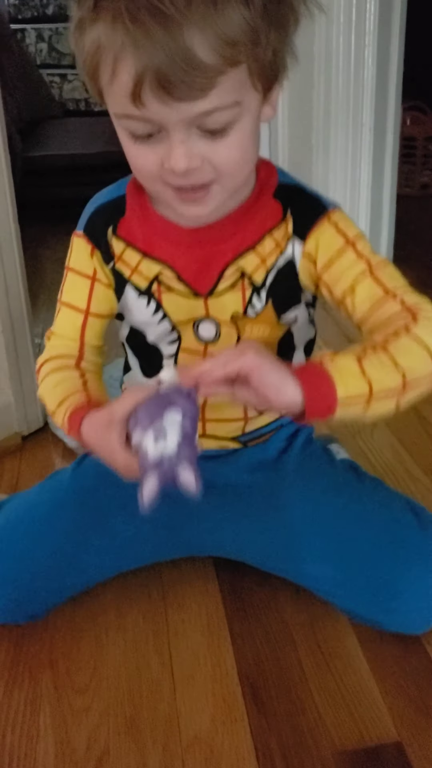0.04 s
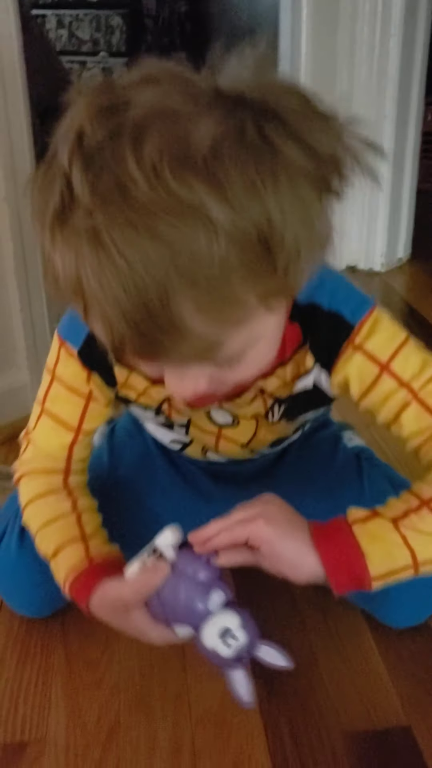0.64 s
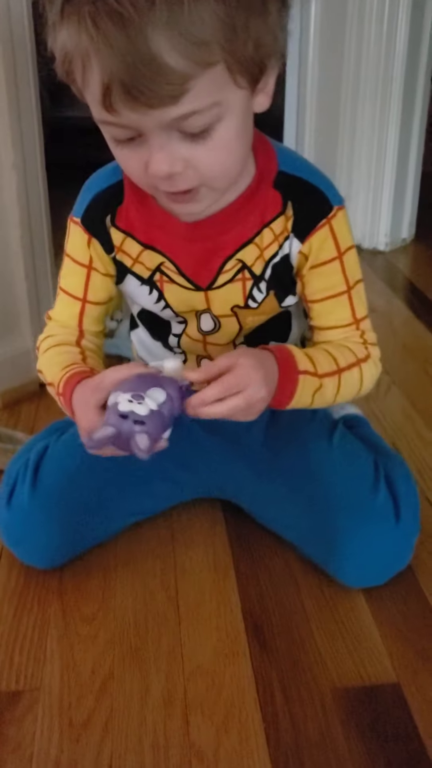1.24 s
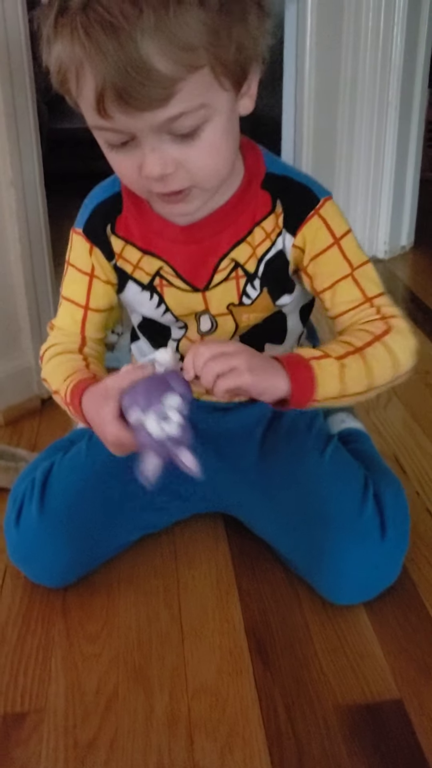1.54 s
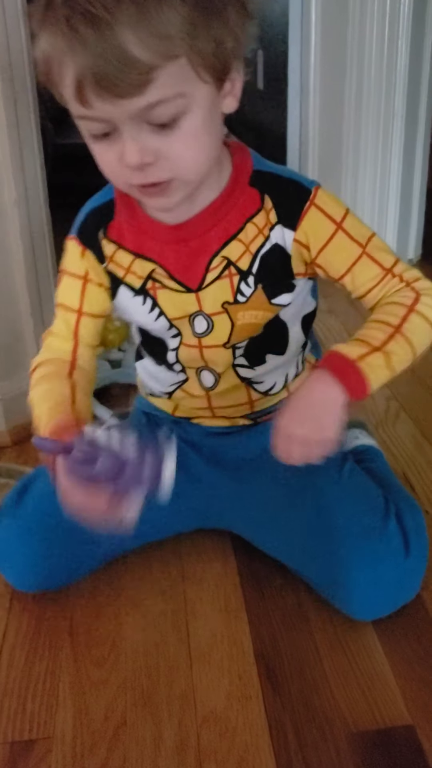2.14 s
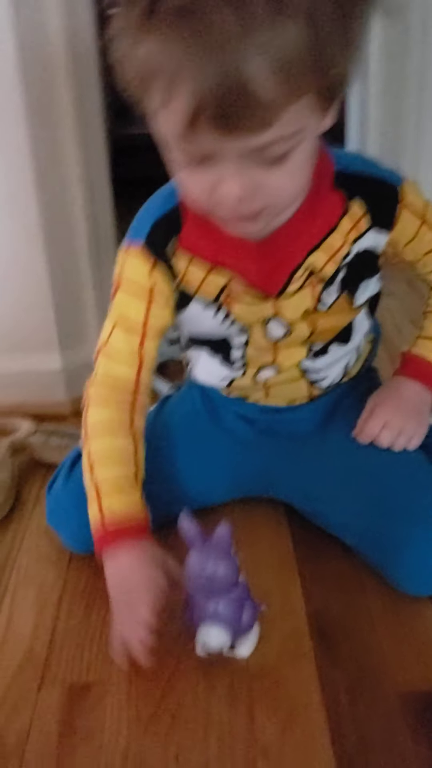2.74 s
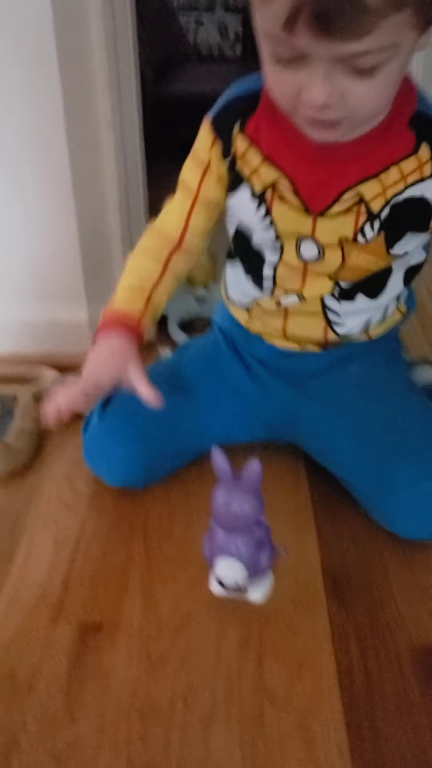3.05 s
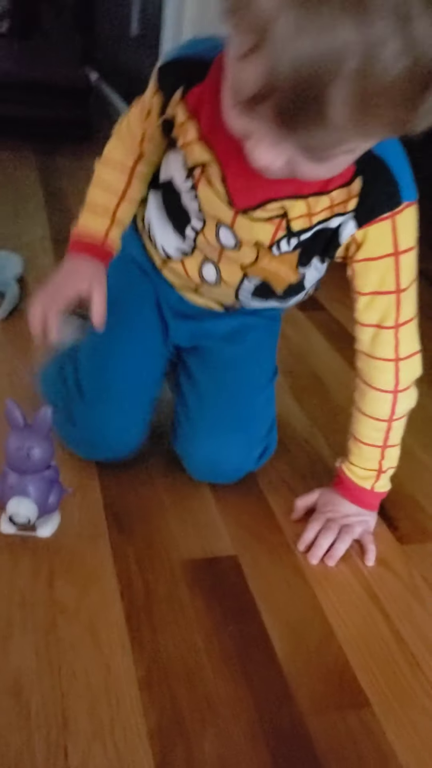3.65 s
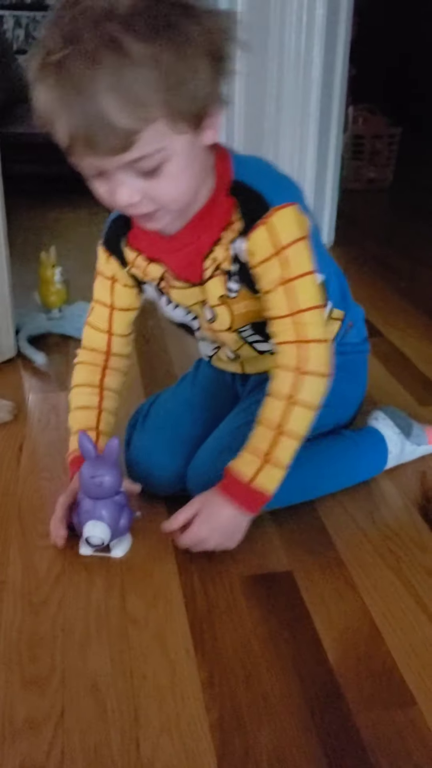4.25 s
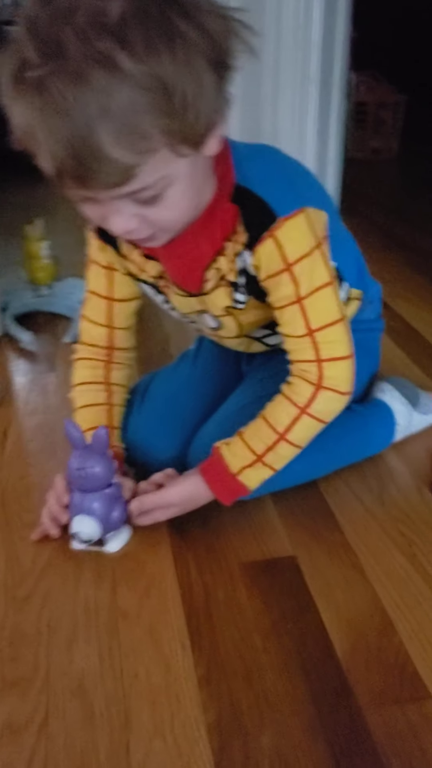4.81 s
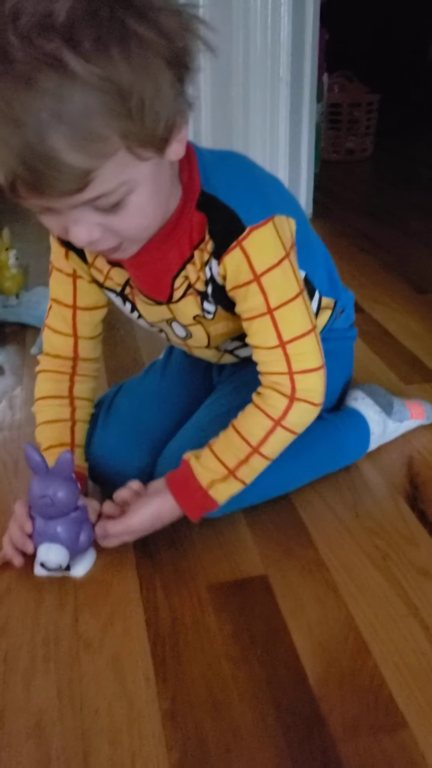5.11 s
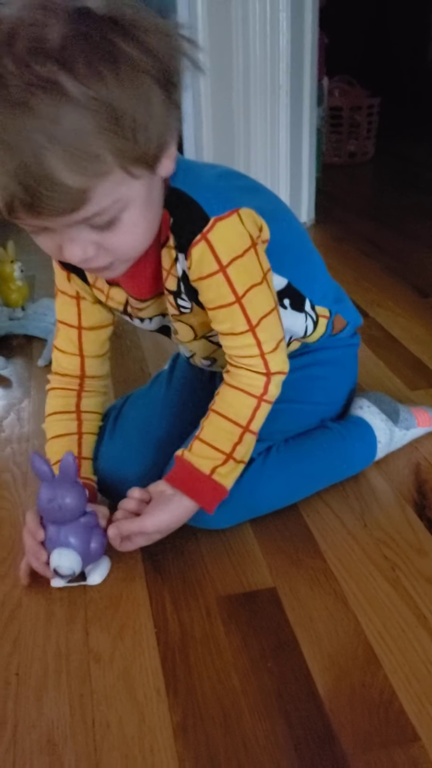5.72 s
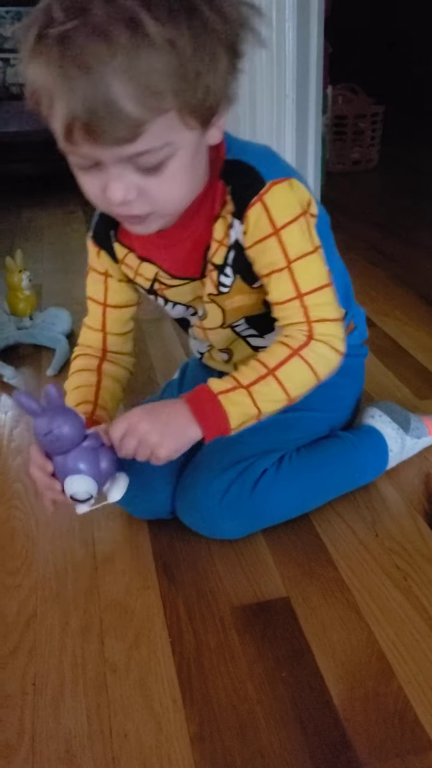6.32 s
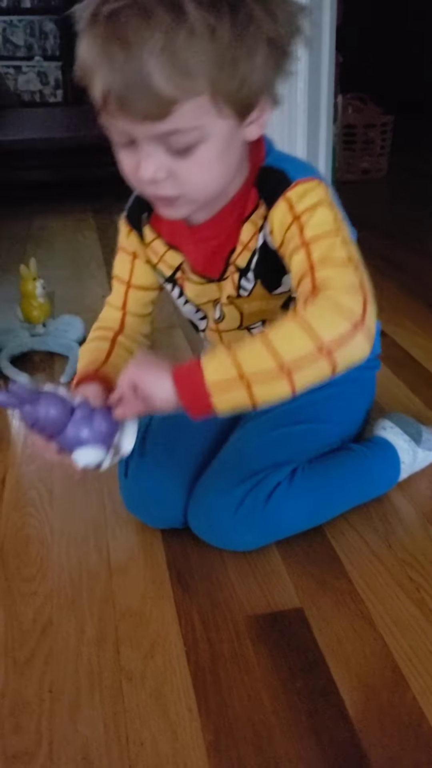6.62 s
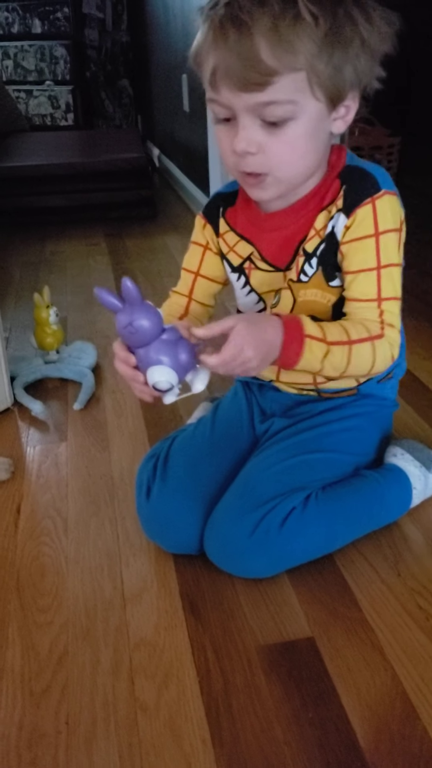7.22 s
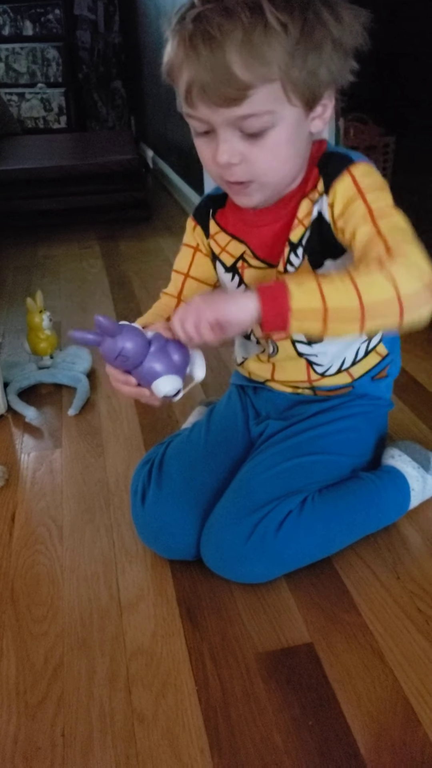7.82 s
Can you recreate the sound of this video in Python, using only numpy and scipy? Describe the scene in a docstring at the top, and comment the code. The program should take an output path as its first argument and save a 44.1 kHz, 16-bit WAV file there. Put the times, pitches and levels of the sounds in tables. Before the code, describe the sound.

A plastic wind-up toy is wound with crisp, uneven clicks and brief whirrs of its gears. It knocks sharply on a wooden floor and clatters, with a few soft bumps. After a lull and some lighter taps, the winding resumes in two faster runs of ratcheting clicks. The microphone is about a metre away in a small, bare room with faint hiss.

```python
"""A plastic clockwork toy is wound and handled on a wooden floor, about a metre from a hand-held phone.
Its pawl snaps over the ratchet teeth and rings the hollow shell; the gears whirr in short runs, and
the toy knocks and clatters. The floor and the hand on the phone add soft bumps and rustle, with one
creak and two faint low tones. A small bare room answers over a thin hiss."""
import sys
import numpy as np
from scipy import signal
from scipy.fft import rfft, irfft, next_fast_len
from scipy.io import wavfile
from scipy.ndimage import uniform_filter1d

SR = 44100
rng = np.random.default_rng(int(sys.argv[2]) if len(sys.argv) > 2 else 0)


def put_to_file(sound):
    """Save the sound as 16-bit audio at rate SR, in the file named by the first command-line argument."""
    columns = np.atleast_2d(sound).T  # one column per channel
    safe = np.clip(columns, -1, 1)
    whole_steps = np.round(safe * 32767)
    wavfile.write(sys.argv[1], SR, whole_steps.astype(np.int16))


N = 355690
TIME = np.arange(N) / SR
SIZE = next_fast_len(N + SR, True)
FREQ = np.maximum(np.arange(SIZE // 2 + 1) * SR / SIZE, 1)
# the phone's left port faces away from the toy: (frequency [Hz], left minus right [dB])
LEFT_PORT_EQ = [(200, -4), (700, 0.5), (1400, -5), (2400, -8), (3300, 5), (4300, -23.5), (5700, -22),
                (7000, -13), (9500, -18.5), (11800, -12), (13400, -13.5), (15500, -7.5)]


def undb(db):
    """Decibels to gain."""
    return 10 ** (np.asarray(db) / 20)


def unit(x):
    """Scale to rms 1."""
    return x / np.sqrt(np.mean(x ** 2))


def curve(points):
    """Automation line through (time [s], value) points."""
    return np.interp(TIME, *np.transpose(points))


def colour(points):
    """EQ curve through (frequency [Hz], level [dB]) points."""
    hz, db = np.transpose(points)
    return undb(np.interp(np.log(FREQ), np.log(hz), db))


def above(hz, order):
    """Gain of a high-pass."""
    return 1 / np.sqrt(1 + (hz / FREQ) ** (2 * order))


def resonance(hz, width_hz):
    """Bell curve of one mode, peaking at 1."""
    return 1 / (1 + ((FREQ / hz - hz / FREQ) * hz / width_hz) ** 2)


def shape(x, gain):
    """Minimum-phase EQ: nothing rings ahead of a transient."""
    cepstrum = irfft(np.log(np.maximum(gain, 1e-6)), SIZE)
    cepstrum[1:SIZE // 2] *= 2
    cepstrum[SIZE // 2 + 1:] = 0
    return irfft(rfft(x, SIZE) * np.exp(rfft(cepstrum)), SIZE)[..., :N]


def walk(rate_hz):
    """Random drift with a spread near 1."""
    knots = np.arange(0, N / SR + 1, 1 / rate_hz)
    return np.interp(TIME, knots, rng.standard_normal(len(knots)))


def gate(start, end, fade_samples):
    """On-off envelope with soft edges."""
    return uniform_filter1d(1. * ((TIME > start) & (TIME < end)), fade_samples)


def spell(start, length, attack_s, release_db_per_s, swell_db=0):
    """Envelope that rises, holds while it swells or sags, then dies away."""
    t = TIME - start
    db = swell_db * np.clip(t / length, 0, 1) - release_db_per_s * np.maximum(t - length, 0)
    return np.clip(t / attack_s, 0, 1) * undb(np.maximum(db, -200))


def add(track, start_s, sound):
    """Mix a sound into a track at its cue."""
    start = max(int(start_s * SR), 0)
    part = track[..., start:start + sound.shape[-1]]
    part += sound[..., :part.shape[-1]]


def room_tone(right_db=-69, left_db=-64):
    """Faint steady room noise, partly alike at the two ports."""
    eq = colour([(500, -15.5), (800, -12), (1100, -15), (2200, 1), (3100, -15.5), (10400, -34)])
    noise = rng.standard_normal(N) + rng.standard_normal((2, N))
    return unit(shape(noise, eq * above(430, order=2))) * undb([[left_db], [right_db]])


def hiss(hiss_trim_db=1, air_trim_db=2, air_left_db=-9, flicker_db=0.2):
    """Wide, slightly wavering hiss with a thin airy top."""
    # fader rides of the two bands: (time [s], level [dB])
    hiss_ride = [(0, -54), (1.4, -54), (2.3, -57), (3.2, -54.5), (3.38, -66), (3.9, -58.5), (4.54, -64.5),
                 (4.62, -71.5), (5.4, -72)]
    air_ride = [(0, -110), (2.1, -48.5), (2.35, -63.5), (4.55, -59.5), (5.1, -61), (8.06, -93)]
    # their spectra: (frequency [Hz], level [dB])
    hiss_eq = [(100, -29), (500, -18), (800, -6), (1100, -11), (1850, -6.5), (2200, 4.5), (3100, -13.5),
               (4400, -9), (5850, -2), (6600, -13.5), (10300, -23.5), (12500, -13), (15500, -24.5)]
    air_eq = [(2000, -36.5), (4500, -0.5), (10300, -9), (12000, 0.5)]
    wide = shape(rng.standard_normal((2, N)), colour(hiss_eq))
    wide[0] = shape(wide[0], colour(LEFT_PORT_EQ))
    air = unit(shape(rng.standard_normal((2, N)), colour(air_eq))) * undb([[air_left_db], [0]])
    wide = unit(wide) * undb(curve(hiss_ride) + hiss_trim_db + flicker_db * walk(6.1))
    return wide + air * undb(curve(air_ride) + air_trim_db)


def rumble(level_db=-78):
    """A steady, barely audible bed of bass."""
    # spectrum of the rumble: (frequency [Hz], level [dB])
    eq = [(10, -34), (25, -5.5), (95, 2.5), (170, -20.5), (350, -16.5), (900, -49.5)]
    return unit(shape(rng.standard_normal(N), colour(eq))) * undb(level_db)


def rustle(rest_db=-80, trim_db=1, patchy_db=3, stereo_width=0.82):
    """Handling close to the phone makes patches of soft, low noise."""
    # hand movements: (start [s], length [s], level [dB])
    moves = [(0.398, 0.064, -70), (1.415, 0.13, -72.5), (2.593, 0.843, -62), (3.585, 0.68, -66.5),
             (4.852, 0.39, -67), (6.975, 0.1, -65.5)]
    # spectrum of the rustle: (frequency [Hz], level [dB])
    eq = [(25, -22), (60, -4), (180, -3.5), (380, -9), (570, -17), (1200, -18.5), (3000, -55)]
    noise = rng.standard_normal(N) + stereo_width * rng.standard_normal((2, N))
    handling = np.max([undb(db) * spell(start, length, attack_s=0.006, release_db_per_s=112)
                       for start, length, db in moves], axis=0)
    envelope = (handling + undb(rest_db)) * undb(trim_db + patchy_db * walk(22))
    return unit(shape(noise, colour(eq))) * envelope


def creak(start_s=4.19, end_s=4.43, gain_db=-60, slip_hz=36, steady_rub=0.66):
    """A surface sticks and slips, each slip a soft pulse of friction noise."""
    cycles = np.cumsum(slip_hz * (1 + .12 * walk(30))) / SR
    slips = np.exp(-(cycles % 1) / .15)
    # spectrum of the friction: (frequency [Hz], level [dB])
    eq = [(300, -23), (400, 8.5), (560, -17), (1100, -5.5), (4500, -38)]
    friction = unit(shape(rng.standard_normal((2, N)), colour(eq)))
    return friction * gate(start_s, end_s, SR // 30) * undb(gain_db) * (steady_rub + 2 * slips)


def low_tones(waver=0.043, swell_db=7, rough_db=3.0, left_db=-5):
    """Two soft, unsteady low tones; each sinks, swells and stops."""
    # tone cues: (start [s], end [s], start pitch [Hz], end pitch [Hz], start level [dB])
    tones = [(1.34, 1.55, 215, 201, -62), (7.17, 7.23, 212, 210, -65)]
    out = np.zeros(N)
    for start, end, start_hz, end_hz, db in tones:
        progress = np.clip((TIME - start) / (end - start), 0, 1)
        hz = (start_hz + (end_hz - start_hz) * progress) * (1 + waver * walk(65))
        envelope = gate(start, end, SR // 40) * undb(db + swell_db * progress + rough_db * walk(140))
        out += envelope * np.sin(2 * np.pi * np.cumsum(hz) / SR)
    return out * undb([[left_db], [0]])


def bumps(rise_s=0.0029, band_ratio=1.175, wide_hz=1100, left_db=1, right_db=5):
    """Soft blows set off broad, short-lived low modes; the lower the mode, the narrower its image."""
    # bumps through floor and hand: (time [s], level [dB], centre [Hz], fall to either side [dB/octave])
    blows = [(2.444, -39.5, 173, -2), (2.5, -37, 223, 7.5), (3.005, -37.5, 348, 9), (3.185, -35, 252, 24.5),
             (3.536, -32.5, 110, 15), (3.629, -46.5, 150, 4.5), (3.729, -46.5, 314, 15),
             (4.53, -53.5, 83, 22), (4.94, -48, 402, 1.5), (5.146, -46.5, 197, 4.5), (6.171, -51, 80, 32),
             (6.715, -44, 69.2, 30)]
    # modes of floor and hand: (frequency [Hz], level [dB], T60 [s])
    modes = [(92, 1, 0.2), (177, 0, 0.26), (352, -2.5, 0.15), (668, -3, 0.25), (1040, 4, 0.17)]
    out, t = np.zeros((2, N)), np.arange(SR // 2) / SR
    for hz, mode_db, t60 in modes:
        band = signal.butter(2, [hz / band_ratio, hz * band_ratio], "band", fs=SR, output="sos")
        soften = signal.butter(3, 2 * hz, fs=SR, output="sos")
        for start, db, centre_hz, fall_db in blows:
            noise = signal.sosfilt(band, rng.standard_normal((2, SR)))
            mid, side = signal.hilbert(noise)[:, -len(t):]
            ring = np.cos(np.angle(mid + hz / wide_hz * side * np.array([[1], [-1]])))
            ring *= (1 - np.exp(-t / rise_s)) * undb(-60 * t / t60)
            gain = undb(db + mode_db - fall_db * abs(np.log2(hz / centre_hz)))
            add(out, start, gain * signal.sosfilt(soften, ring))
    return out * undb([[left_db], [right_db]])


def room(x, t60_s=0.46, top_t60_s=0.27, split_hz=7500, top_db=-3.5, wet_db=-6, left_db=2):
    """Hard floor and walls give a dense tail whose treble dies first."""
    t = np.arange(SR) / SR
    noise = rng.standard_normal((2, SR)) * (1 - np.exp(-(t / 0.00046) ** 2))
    low = signal.sosfilt(signal.butter(2, split_hz, fs=SR, output="sos"), noise)
    high = signal.sosfilt(signal.butter(2, split_hz, "high", fs=SR, output="sos"), noise)
    tail = low * undb(-60 * t / t60_s) + high * undb(top_db - 60 * t / top_t60_s)
    tail /= np.sqrt(SR * t60_s / np.log(1e6))  # divide out the gain of the long decay
    return signal.fftconvolve(x, tail, axes=1)[:, :N] * undb([[wet_db + left_db], [wet_db]])


def both_ports(push, lag_s=0.00013):
    """The body's long waves reach both ports alike, the left one a little later."""
    return np.array([np.interp(TIME - lag_s, TIME, push[1]), push[1]])


def support(push, coupling_db=-12, lift_s=6.85, fade_db_per_s=20):
    """Whatever carries the toy adds two hollow modes, fading as it is lifted and held more loosely."""
    modes = resonance(750, width_hz=270) + resonance(1560, width_hz=270)
    coupling = undb(coupling_db - fade_db_per_s * np.maximum(TIME - lift_s, 0))
    return shape(push * coupling, unit(modes * above(700, order=4)))


def shell_ranges(lowest_hz=900, body_top_hz=3800, ring_top_hz=9800, scoop_hz=10300, scoop_db=-8.5):
    """EQs of the shell's ring (middle), body (low) and tick (top); it is too small to radiate bass."""
    # modes of the plastic shell: (frequency [Hz], width [Hz], level [dB])
    modes = [(1490, 200, 2), (2004, 320, 1), (2635, 307, 7), (3250, 700, -6.5), (4560, 270, -7.5),
             (5020, 200, -5.5), (5550, 240, -5), (5960, 250, -4.5), (7660, 1120, -9), (8480, 680, -20.5),
             (11990, 440, -9.5), (13420, 550, -8.5), (16600, 2100, -9.5)]
    power = sum(undb(db) ** 2 * resonance(hz, width) for hz, width, db in modes)
    scoop = undb(scoop_db * np.exp(-((FREQ - scoop_hz) / 900) ** 2))
    response = np.sqrt(power) * above(lowest_hz, order=3) * scoop
    upper, tick = above(body_top_hz, order=10), above(ring_top_hz, order=10)
    ring = upper * np.sqrt(1 - tick ** 2)
    body = np.sqrt(1 - upper ** 2)
    return [unit(response * band) for band in (ring, body, tick)]


def shell(pushes):
    """The hollow toy answers a separate push in each range: ring, body and tick."""
    return sum(shape(push, gain) for push, gain in zip(pushes, shell_ranges()))


def ping(push, hz, width_hz, ping_db):
    """One pitch of the shell stands out, depending on where it is struck; the energy stays the same."""
    peak = signal.lfilter(*signal.iirpeak(hz, hz / width_hz, fs=SR), push)
    rung = push + undb(ping_db) * peak
    return rung * np.linalg.norm(push) / np.linalg.norm(rung)


def zing(push, hz=13100, width_hz=700):
    """A brightly running gear train sets one high resonance singing."""
    return shape(push, unit(1 / (1 + ((FREQ - hz) / width_hz) ** 2)))


def gears(jitter=0.065, scatter_db=-1.5, decay_periods=0.58):
    """Uneven teeth tick past too fast to count; returns pushes for ring, body, tick and zing."""
    # whirrs as the key is twisted or the toy is jolted:
    # (start [s], length [s], level [dB], swell [dB], brightness [dB], tooth rate [Hz])
    runs = [(0.715, 0.13, -39.5, -10, -0.5, 130), (0.89, 0.12, -48.5, 2, 0, 106),
            (1.005, 0.042, -38.5, 3.5, 1.5, 165), (1.525, 0.2, -47, -3, 0, 117),
            (1.768, 0.11, -37.5, -4.5, -0.5, 130), (1.85, 0.095, -29.5, -8, 0, 81),
            (1.95, 0.11, -44.5, -4, -4, 112), (2.28, 0.011, -42, -2.5, -5.5, 87),
            (2.438, 0.072, -18.5, -16, -3.5, 85), (2.53, 0.28, -38.5, -7, 0.5, 81),
            (4.69, 0.02, -49.5, -6.5, -6, 97), (4.868, 0.1, -45.5, 6, -0.5, 100),
            (6.793, 0.058, -36.5, 10.5, 0.5, 134), (6.85, 0.13, -27, -0.5, 1.5, 139),
            (7.18, 0.059, -32, -1.5, 2, 182), (7.25, 0.14, -41.5, 2, 1.5, 154),
            (7.77, 0.29, -45, -0.5, -0.5, 103)]
    drive, tooth_hz = np.zeros((4, N)), np.full(N, float(runs[0][-1]))
    for start, length, db, swell_db, bright_db, rate in runs:
        # a bright run has less body, more tick and more zing
        gains = undb(db + np.array([-4, -10 - 0.96 * bright_db, -1 + bright_db, -10 + 3 * bright_db]))
        envelope = spell(start, length, attack_s=0.0083, release_db_per_s=372, swell_db=swell_db)
        drive = np.maximum(drive, np.outer(gains, envelope))
        tooth_hz[TIME >= start] = rate
    teeth_passed = np.cumsum(tooth_hz * (1 + jitter * walk(90))) / SR
    sizes = undb(scatter_db * rng.standard_normal(N // 50))[teeth_passed.astype(int)]
    pulses = sizes * np.exp(-(teeth_passed % 1) / decay_periods)
    return drive[:, None] * unit(pulses * rng.standard_normal((4, 2, N)))


def snap(rise_s, chatter_s, spikiness=1.12):
    """Plastic parts meet in a few ms of tiny impacts; each port hears its own pattern."""
    t = np.arange(SR // 60) / SR
    envelope = (1 - np.exp(-(t / rise_s) ** 2)) / (1 + (t / chatter_s) ** 4)
    noise = rng.standard_normal((2, len(t)))
    impacts = envelope * np.sign(noise) * np.abs(noise) ** spikiness
    return impacts * np.linalg.norm(envelope) / np.linalg.norm(impacts, axis=1, keepdims=True)


def strikes(hits, body_trim_db, rise_s, chatter_s, ping_width_hz, ping_db,
            rattles=0, rattle_db=-23, rattle_s=0.028, lead_s=0.00076):
    """Each contact pings at its own pitch and pushes ring, body and tick; loose parts may rattle."""
    pushes, span = np.zeros((3, 2, N)), SR // 20
    bins_hz = np.fft.rfftfreq(span, 1 / SR)
    responses = np.array([np.interp(bins_hz, FREQ, gain) for gain in shell_ranges()])[:, None]
    for start, db, body_db, tick_db, ping_hz in hits:
        stretch, body_pitch = np.exp(np.array([0.21, 0.19]) * rng.standard_normal(2))
        stretch *= np.exp(-0.049 * max(tick_db, 0))  # the more tick, the shorter the contact
        contact = np.zeros((2, span))
        add(contact, 0, snap(rise_s * stretch, chatter_s * stretch))
        for late, size in rng.random((rattles, 2)):
            rattle = undb(rattle_db) * 2 * size * snap(rise_s / 2, chatter_s / 2)
            add(contact, chatter_s + late * rattle_s, rattle)
        ring = ping(contact, ping_hz, ping_width_hz, ping_db)
        body = ping(ring, hz=2200 * body_pitch, width_hz=690, ping_db=2.5)
        parts = np.array([ring, body, contact])
        energy = np.mean(np.abs(rfft(parts) * responses) ** 2, axis=2, keepdims=True)
        parts *= np.sqrt(0.004 * SR / energy)  # through the shell, each has the energy of 4 ms at rms 1
        gains = undb(db + np.array([0, body_db + body_trim_db, tick_db]))
        add(pushes, start - lead_s, gains[:, None, None] * parts)
    return pushes


def knocks(ping_hz=5290, pitch_spread=0.13):
    """Blows land all over the outside of the toy, each with its own pitch, and shake its loose parts."""
    # the toy knocks on the floor, clatters and is set straight:
    # (time [s], ring level [dB], body over ring [dB], tick over ring [dB])
    blows = [(2.2651, -38.5, 1, -2.5), (2.4418, -14, -6.5, -5), (2.4464, -26.5, -4.5, 12),
             (2.4655, -21.5, -7, -5.5), (2.4734, -19.5, -17, -3), (2.4782, -23, -4, -1.0),
             (2.5012, -22, -9, -10), (2.5159, -28.5, 1.5, 7), (2.522, -21, -18, -0.5),
             (2.5314, -21, -5.5, 1), (2.5589, -25, -2.5, 2), (2.6028, -22.5, -5.5, -3),
             (2.616, -22.5, -1.5, 1), (2.6717, -25.5, -2, -5), (2.705, -25.5, -1.5, -3),
             (2.7419, -32.5, 4.5, 4.5), (2.7767, -30, 0.5, -4), (2.783, -32, -0.5, -12),
             (2.8687, -39, -11, 1), (2.881, -38, -3, -4), (2.9452, -34, 0, -2), (2.9604, -35.5, -8, -2),
             (2.9674, -29.5, 0.5, -5), (3.421, -61.5, -15, 15), (4.8755, -39.5, -4, 5),
             (4.8904, -38.5, 0, 7), (4.942, -30, 2.5, 2), (4.9524, -29.5, -5, 0), (5.07, -47, -3, -4),
             (5.1327, -43.5, 6, -10), (5.242, -40.5, -5.5, 2.5), (5.292, -49.5, -12, -9),
             (5.343, -50.5, -3, -3), (5.377, -50, -5.5, 10), (5.454, -51.5, -21, 10),
             (5.698, -44, -9.5, -6)]
    pitches = ping_hz * np.exp(pitch_spread * rng.standard_normal(len(blows)))
    return strikes(np.column_stack([blows, pitches]), body_trim_db=-1.5, rise_s=0.0011,
                   chatter_s=0.0048, ping_width_hz=440, ping_db=4, rattles=8)


def pawl():
    """The pawl drops over a ratchet tooth as the key turns: crisp snaps, some a ping, some a tick."""
    # one snap a tooth: (time [s], ring level [dB], body over ring [dB], tick over ring [dB], ping [Hz])
    snaps = [(0.0633, -34, -4, 0, 5700), (0.1653, -36.5, -6.5, 0.5, 6270), (0.2758, -32, -13, 2.5, 5650),
             (0.397, -32, -12.5, 8, 5100), (0.4433, -30.5, -5.5, 5.5, 5670), (0.4628, -31.5, -4, -6, 4870),
             (0.4754, -24.5, -5.5, 2.5, 5600), (0.5135, -24.5, -8.5, 1.5, 5800),
             (0.6051, -28.5, -3, -1, 6280), (0.7788, -34.5, 3.5, 0.5, 4300), (0.8044, -30.5, 2, 3.5, 2620),
             (0.9017, -36.5, -3.5, 2.5, 4550), (1.499, -33.5, -8.5, 2.5, 5200),
             (1.5369, -30, -10, -4.5, 5750), (1.5606, -45, 5, 17, 5800), (1.5832, -32, -7, 2.5, 5000),
             (1.6042, -34.5, -9, -5, 5640), (1.6248, -28.5, -14, -6, 5570), (1.6503, -30, -13.5, -5, 5850),
             (1.6812, -30, -19, 0, 5860), (2.0087, -31.5, -7.5, -6, 5890), (5.8401, -25.5, -15, -1.5, 5910),
             (5.8954, -25.5, -15.5, 3, 5910), (5.9902, -28.5, -8.5, 5.5, 5430),
             (6.0364, -29, -10, 6.5, 5260), (6.0612, -25.5, -8, 4, 6100), (6.0866, -28, -8, 5.5, 5770),
             (6.128, -26.5, -11.5, 3, 5660), (6.1835, -21.5, -20, -3, 5570),
             (6.2136, -25.5, -16, 4.5, 5570), (6.2462, -27.5, -11, 3, 5880), (6.283, -29, -13, 1, 5630),
             (6.3152, -33, -4.5, 11, 4360), (6.3436, -27, -14.5, 1, 5600), (6.3698, -20, -26, -5, 5950),
             (6.3986, -30.5, -16.5, 10, 5660), (6.4301, -30, -11, 11, 5700), (6.4562, -28, -9.5, 2, 4940),
             (6.4885, -27.5, -12, 9, 5710), (6.5164, -30, -8, 6, 5770), (6.5409, -31, -10, 7, 4670),
             (6.5678, -26.5, -3.5, 7, 4340), (6.6499, -30.5, -10.5, 5.5, 6030),
             (7.432, -38.5, -7, -11, 5700), (7.5754, -30.5, -7.5, 3, 5310), (7.6245, -27, -12.5, 1.5, 5580),
             (7.664, -28, -9.5, 2.5, 5620), (7.7062, -28, -10.5, 3, 5620), (7.7378, -28.5, -11.5, -1, 5290),
             (7.7706, -31.5, -11, -2, 5600), (7.7972, -30, -5.5, 2, 5200), (7.8244, -32.5, -19, 8, 5160),
             (7.8472, -32, -9, 6.5, 5820), (7.889, -29.5, -10, 1, 5570), (7.9356, -31.5, -11, 3.5, 5820),
             (7.9886, -27, -7, -4, 5500)]
    return strikes(snaps, body_trim_db=-2, rise_s=0.0021, chatter_s=0.0047, ping_width_hz=550, ping_db=8)


def scene(toy_db=3, knock_send_db=2, gear_send_db=-3, near_left_db=-3):
    """Pawl, knocks and gears sound through shell, support and room, duller on the left, over the bed."""
    gear_ring, gear_body, gear_tick, gear_zing = gears()
    knock_ring, knock_body, knock_tick = knocks()
    pawl_ring, pawl_body, pawl_tick = pawl()
    ring = pawl_ring + knock_ring + ping(gear_ring, hz=5780, width_hz=690, ping_db=3)
    body = pawl_body + knock_body + ping(gear_body, hz=1490, width_hz=510, ping_db=-4)
    tick = pawl_tick + knock_tick + gear_tick
    support_send = pawl_body + undb(knock_send_db) * knock_body + undb(gear_send_db) * gear_body
    toy = shell([ring, both_ports(body), tick]) + support(both_ports(support_send)) + zing(gear_zing)
    toy *= undb(toy_db)
    heard = toy + room(toy)
    heard[0] = shape(heard[0], colour(LEFT_PORT_EQ))
    bed = bumps() + low_tones() + hiss() + room_tone()
    near = (rustle() + rumble() + creak()) * undb([[near_left_db], [0]])
    return heard + bed + near


def record(dry, top_hz=15900):
    """The phone rounds the loudest peak and cuts the top."""
    return signal.sosfilt(signal.ellip(10, .2, 70, top_hz, fs=SR, output="sos"), np.tanh(dry))


dry = scene()
out = record(dry)
put_to_file(out)
```